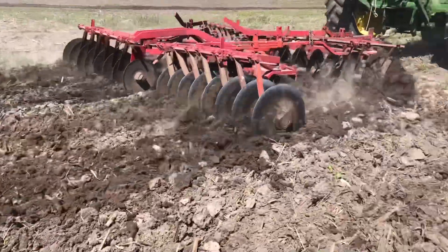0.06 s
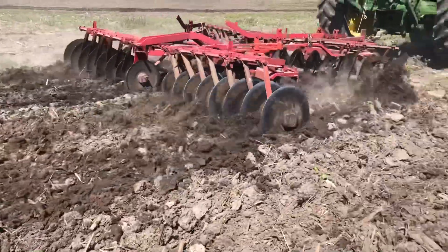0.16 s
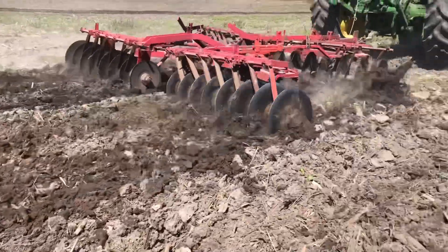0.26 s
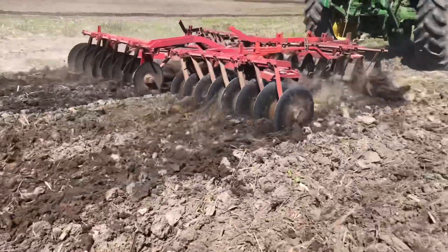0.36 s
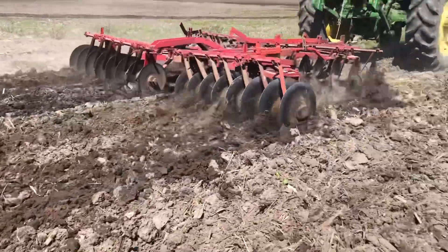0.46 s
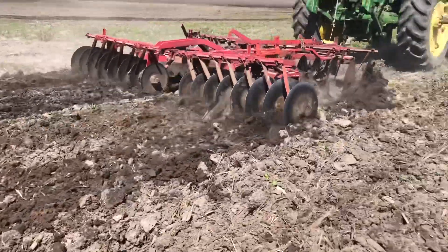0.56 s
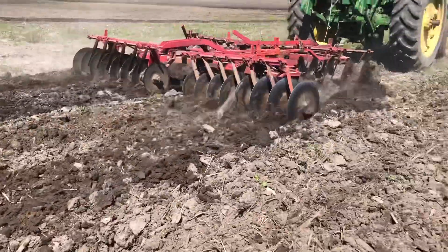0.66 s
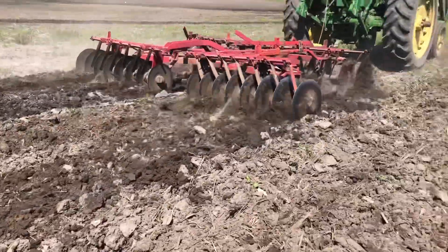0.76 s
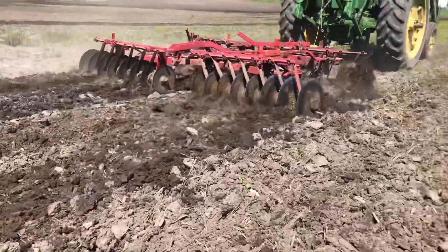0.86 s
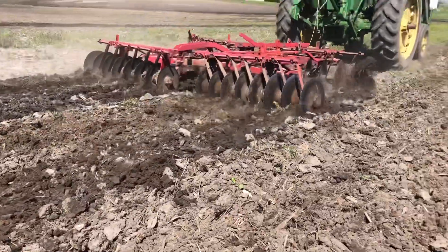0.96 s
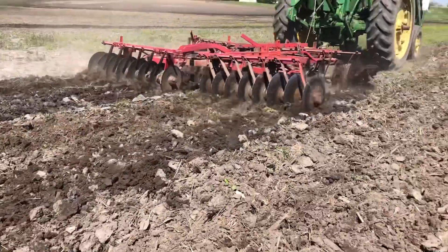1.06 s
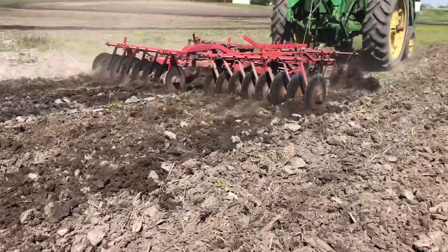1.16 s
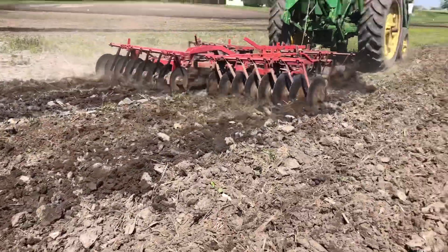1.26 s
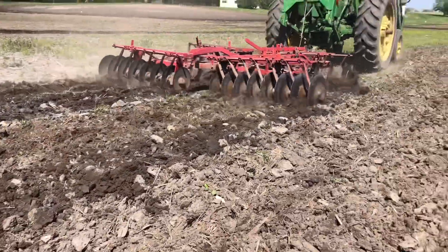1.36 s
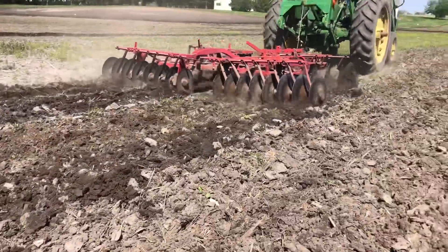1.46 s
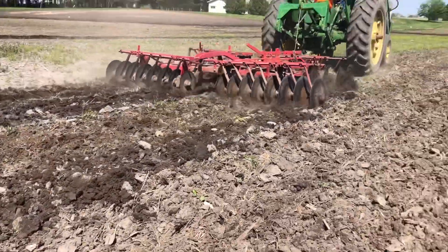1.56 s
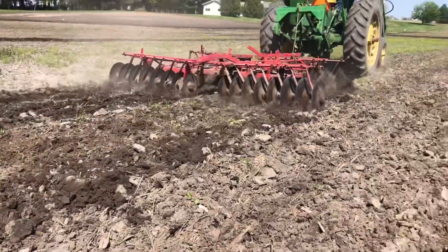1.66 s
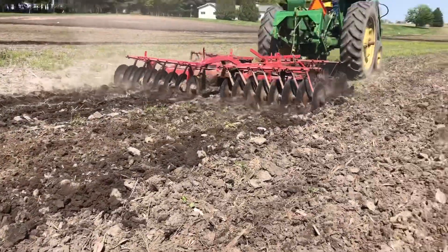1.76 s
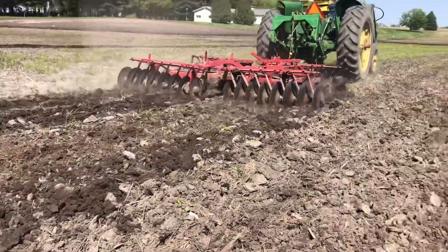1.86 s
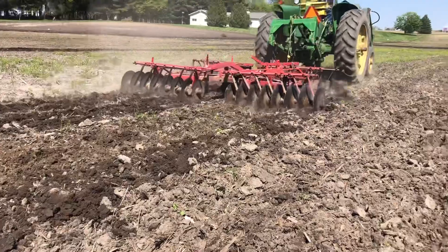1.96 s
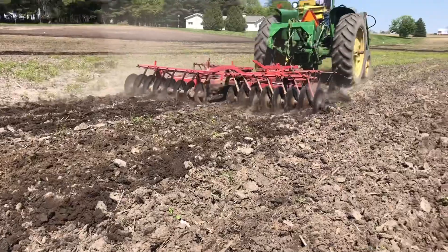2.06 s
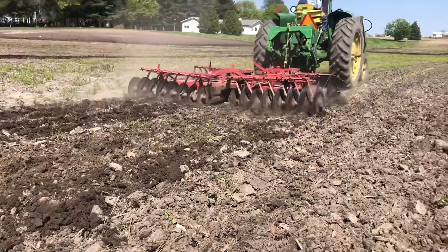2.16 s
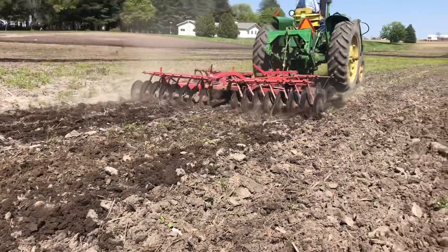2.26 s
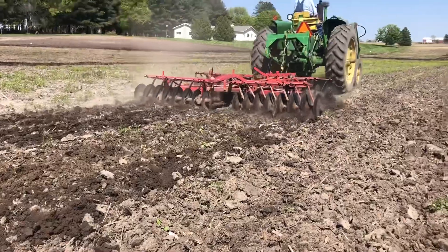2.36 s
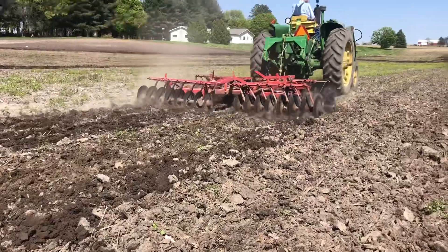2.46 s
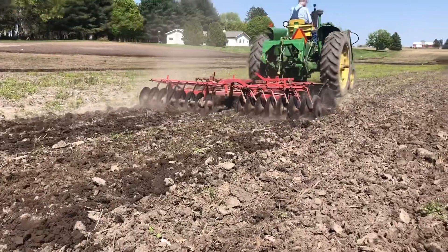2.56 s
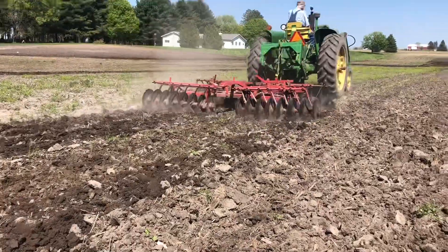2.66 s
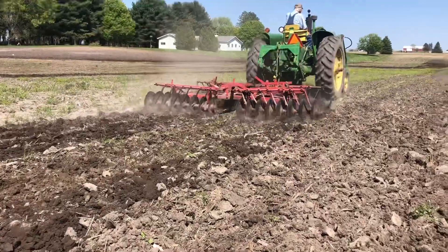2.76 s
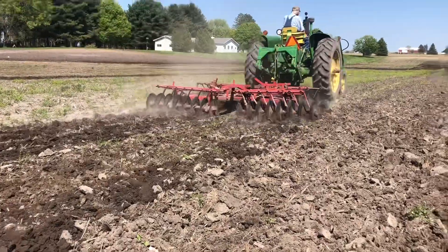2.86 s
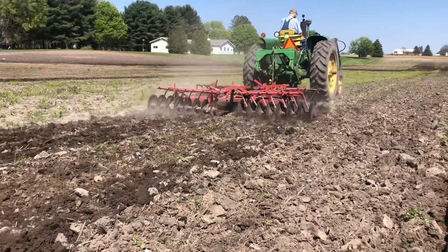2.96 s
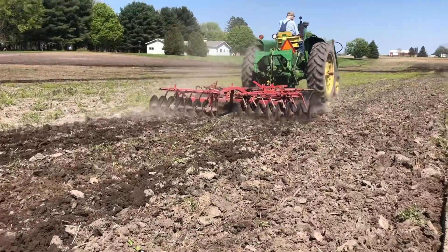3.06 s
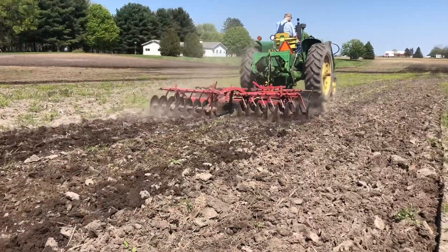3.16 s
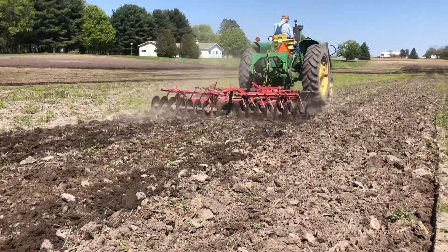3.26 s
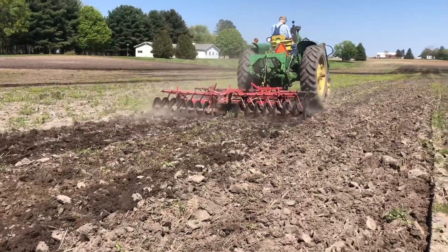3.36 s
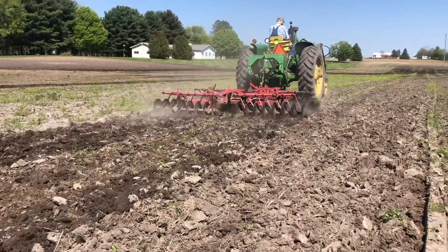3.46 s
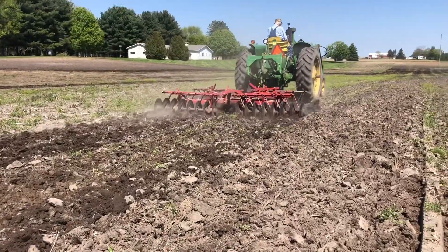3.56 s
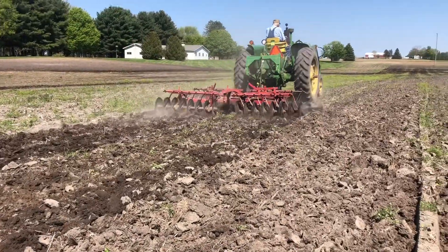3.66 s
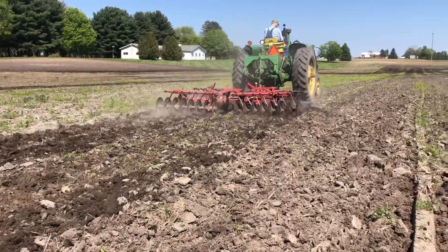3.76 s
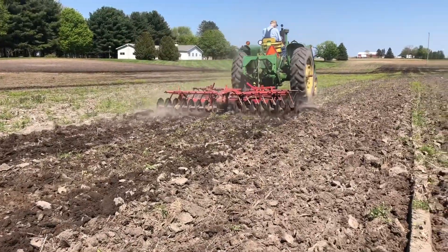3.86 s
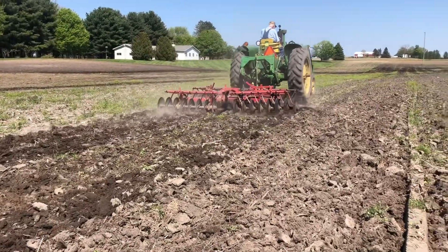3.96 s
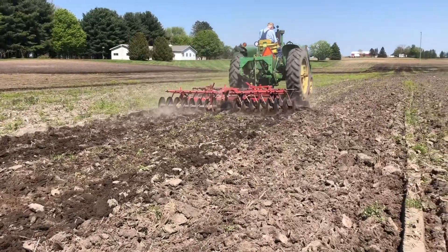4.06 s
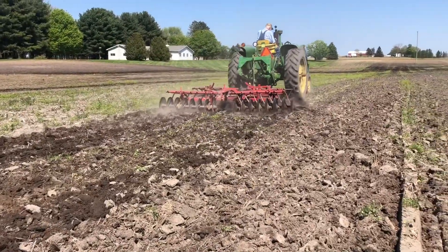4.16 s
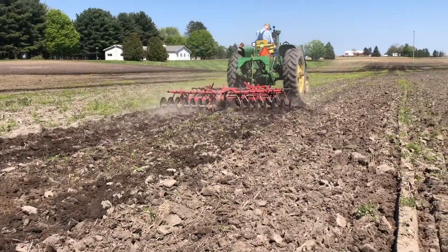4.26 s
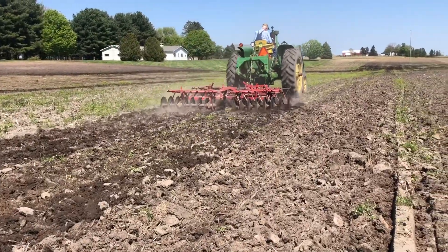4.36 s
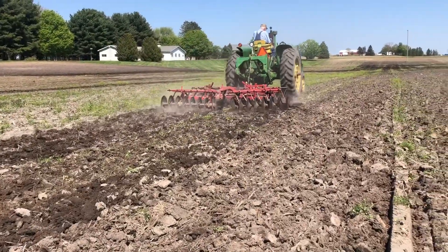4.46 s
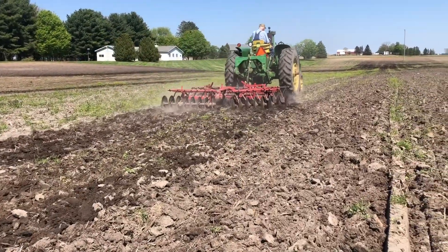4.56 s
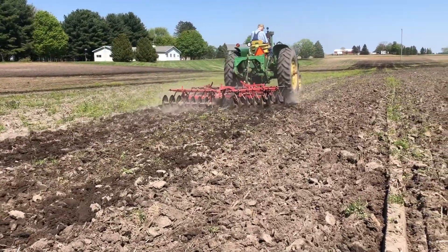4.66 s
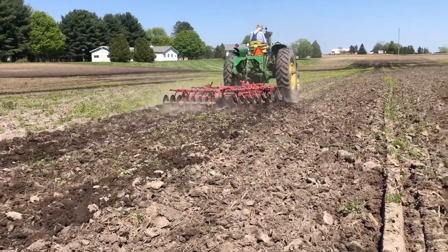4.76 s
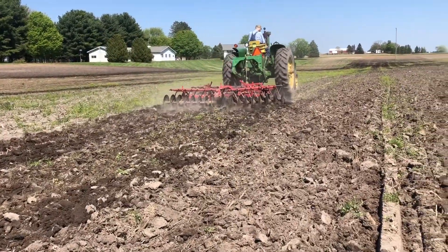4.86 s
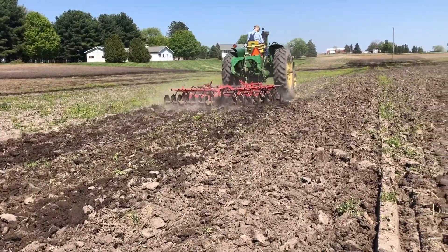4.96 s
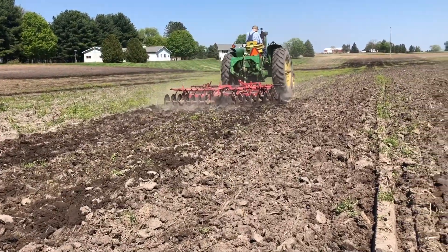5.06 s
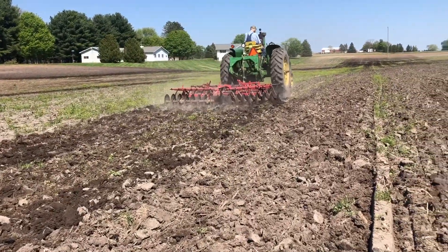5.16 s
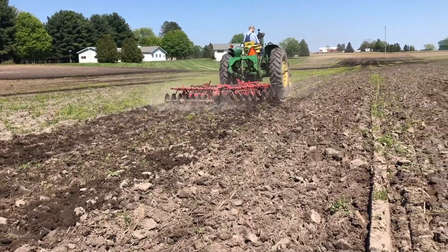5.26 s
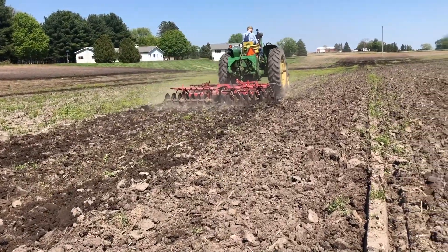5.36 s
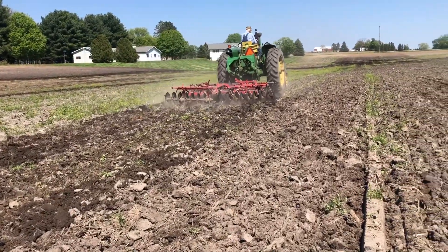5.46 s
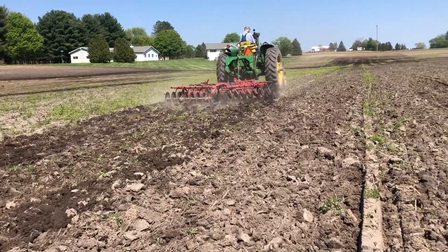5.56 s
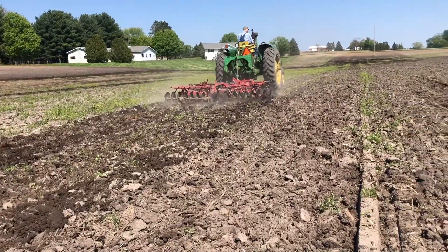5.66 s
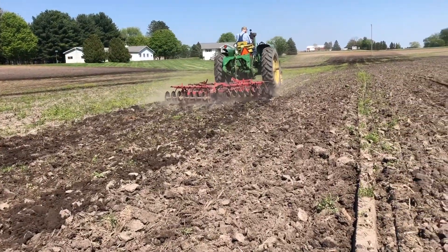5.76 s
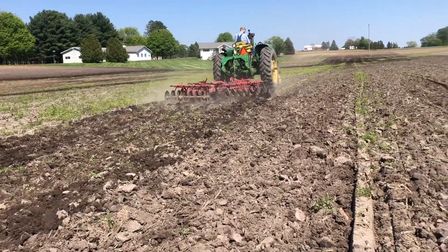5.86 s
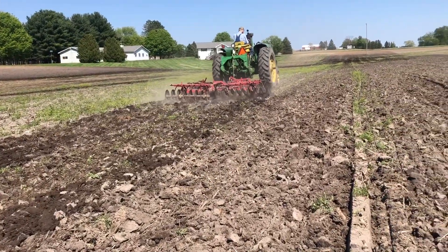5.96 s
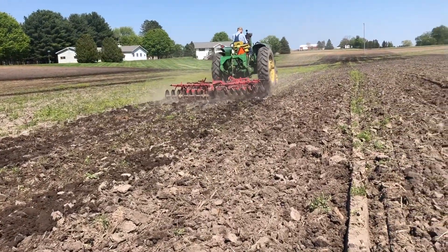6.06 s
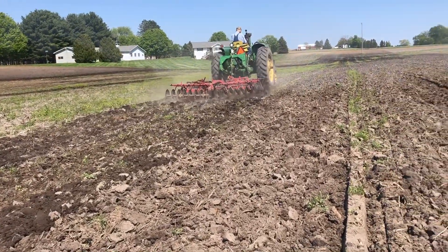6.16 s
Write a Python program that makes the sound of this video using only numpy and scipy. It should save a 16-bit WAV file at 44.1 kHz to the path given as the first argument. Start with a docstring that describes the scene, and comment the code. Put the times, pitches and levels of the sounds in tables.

```python
"""Dry, open field, a phone as microphone. A four-cylinder tractor pulls a disc harrow away, 10 m to 21 m.
From the start uneven firings boom in the exhaust, valve gear clatters and gears whine, while the discs
crunch through soil, scrape on gravel and clink on stones. Between 2 and 4 s dry bearings squeak.
Around 5 s a loose panel buzzes harder with the engine; just after 6 s a disc rim squeals on steel."""
import sys
import numpy as np
from scipy import signal
from scipy.fft import rfft, irfft
from scipy.io import wavfile
from scipy.ndimage import uniform_filter1d

SR = 44100
rng = np.random.default_rng(int(sys.argv[2]) if len(sys.argv) > 2 else 0)


def digitize_waveform(pressure):
    """Quantize a signal to 16-bit integers and store it at the path in sys.argv[1].

    Rows of a 2-D input are taken as channels; values are limited to [-1, 1].
    """
    field = np.atleast_2d(pressure).T
    bounded = np.clip(field, -1, 1)
    quanta = np.round(bounded * 32767).astype(np.int16)
    wavfile.write(sys.argv[1], SR, quanta)


N = 273861
TOP_HZ = 15750  # upper limit of the microphone

# the cylinders in firing order: strength/dB, lag in the manifold/ms
CYLINDERS = [(-3.5, 5.95), (2.07, 5.21), (-1.5, 5.64), (3, 6.42)]


def undb(db):
    """Decibels to gain."""
    return 10 ** (np.asarray(db) / 20)


def level(x, db=0):
    """Set the rms level."""
    return x * undb(db) / np.sqrt(np.mean(x ** 2))


def curve(points):
    """One value per sample along (t/s, value) points."""
    return np.interp(np.arange(N) / SR, *np.transpose(points))


def walk(rate):
    """Random values held for 1 / rate seconds and smoothed twice; rms 1."""
    hold = int(SR / rate)
    steps = np.repeat(rng.standard_normal(N // hold + 1), hold)
    return level(uniform_filter1d(uniform_filter1d(steps, hold), hold)[:N])


def colour(x, points, size=16384):
    """Minimum-phase filter through (f/Hz, level/dB) points; circular, so steady sounds have no onset."""
    hz, db = np.transpose(points)
    grid = np.maximum(np.arange(size // 2 + 1) * SR / size, 1)
    gain = undb(np.interp(np.log(grid), np.log(hz), db))
    cepstrum = irfft(np.log(gain))
    cepstrum[1:size // 2] *= 2
    cepstrum[size // 2 + 1:] = 0
    response = irfft(np.exp(rfft(cepstrum)))
    return irfft(rfft(x) * rfft(response, len(x)), len(x))


def band(x, hz, width):
    """One resonance, gain 1 at the centre."""
    top = .45 * SR
    return signal.lfilter(*signal.iirpeak(min(hz, top), hz / min(width, top / 2), fs=SR), x)


def body(x, modes):
    """Steep-skirted resonances (f/Hz, width/Hz, level/dB), summed to rms 1."""
    return level(sum(undb(db) * band(band(x, hz, width), hz, width) for hz, width, db in modes))


def add(out, s, x):
    """Mix x into out at time s."""
    i = int(np.clip(s * SR, 0, N - 1))
    out[i:i + len(x)] += x[:N - i]


def swell(length):
    """A smooth rise and fall over length seconds."""
    return np.sqrt(np.hanning(int(length * SR)))


def soil(cracks_per_s=520, spread_db=6.5, crack_db=-4, hiss_db=5.0):
    """Steel slides through earth with a hiss while clods and dry stalks break in tiny cracks."""
    # colour of crumbling soil: f/Hz, level/dB
    crumble = [(300, -9), (1500, 4.5), (4400, 4), (5300, 1), (6500, 0), (8400, 1), (10500, -1.5),
               (13000, -5.5), (16000, -5)]
    pitches = np.geomspace(3000, 15000, num=7)
    cracks = 0
    for hz in pitches:
        sizes = undb(spread_db * np.minimum(rng.exponential(size=N), 4))
        breaks = rng.random(N) < cracks_per_s / len(pitches) / SR
        cracks += band(breaks * sizes * rng.choice([-1, 1], N), hz, width=1270)
    earth = colour(level(cracks, crack_db) + undb(hiss_db) * rng.standard_normal(N), crumble)
    spurts_db = 0.8 * walk(25.07) + 1.6 * walk(90)  # clods give way unevenly
    return level(earth) * undb(spurts_db)


def clink(treble_db, crack_s=.0004, grit_db=-13, grit_t60_s=0.048, ring_db=-34):
    """A stone meets a disc: a sharp crack, a spray of grit and a short ring."""
    # modes of a disc, damped by the earth: f/Hz, level/dB, t60/s
    disc_modes = [(2730, -10, 0.046), (4470, 11.5, 0.05), (4940, -10, .035), (5800, -16, .04),
                  (6500, 5, .03), (7150, -10, .04), (8500, 0, 0.035), (9250, 9.5, 0.029)]
    t = np.arange(SR // 5) / SR
    push = np.exp(-t / crack_s) + undb(grit_db) * undb(-60 * t / grit_t60_s)
    ring = 0
    for hz, db, t60 in disc_modes:
        strength = undb(db + 2 * rng.standard_normal())
        pitch = hz * (1 + 0.016 * rng.standard_normal())
        ring += strength * np.sin(2 * np.pi * pitch * t) * undb(-60 * t / t60)
    tone = [(700, -29), (2200, -4.5), (4000, 4), (6200, 3),
            (10000, treble_db + 20), (15000, treble_db + 9)]
    hit = colour(push * rng.choice([-1, 1], len(t)) + undb(ring_db) * ring, tone, size=512)
    return undb(-12) * hit / np.std(hit[:128])  # the first 3 ms carry the strength of the blow


def pebbles(per_s=5.5, range_db=22):
    """Small stones tick on the discs at random moments."""
    out = np.zeros(N)
    for when, strength in rng.random((int(per_s * N / SR), 2)):
        add(out, when * N / SR, undb(-33 + range_db * strength) * clink(treble_db=-7))
    return out


def squeals():
    """A disc rim rubs on steel, which excites its high resonances."""
    # resonances of the rim: f/Hz, width/Hz, level/dB
    rim_modes = [(6050, 900, -8), (9830, 170, 3), (12400, 700, -6), (14050, 300, 0), (14700, 1400, -7)]
    # rubs: t/s, length/s, level/dB
    rubs = [(6.097, 0.025, -37.5), (6.137, 0.071, -42)]
    ringing = body(rng.standard_normal(N), rim_modes)
    pressure = np.zeros(N)
    for s, length, db in rubs:
        add(pressure, s, level(swell(length), db))
    return pressure * ringing


def squeaks(waver=0.0052, overtone_db=-11, flutter_db=4):
    """Stick-slip in a dry disc bearing: a wavering, fluttering tone with weak overtones."""
    # slips of the bearings: t/s, length/s, level/dB, f/Hz
    slips = [(2.081, .016, -37.5, 1810), (2.605, 0.013, -35, 3820), (3.538, 0.023, -38.5, 4260),
             (3.571, 0.045, -32, 4200)]
    out = np.zeros(N)
    for s, length, db, hz in slips:
        shape = swell(length)
        drift, grip = walk(730)[:len(shape)], walk(360)[:len(shape)]
        phase = 2 * np.pi * np.cumsum(hz * (1 + waver * drift)) / SR
        tone = sum(undb(overtone_db * k) * np.sin((k + 1) * phase) for k in range(int(TOP_HZ / hz)))
        add(out, s, level(tone * shape * undb(flutter_db * grip), db))
    return out


def scrapes(rough_db=3):
    """Clods and buried gravel catch and slip along a disc."""
    # grinding contacts: t/s, length/s, level/dB, f/Hz
    contacts = [(.672, 0.026, -31.5, 1400), (.674, .05, -38.5, 4200), (0.871, 0.29, -40, 620),
                (1.692, 0.018, -29, 3180), (1.712, 0.028, -34, 4000), (1.782, 0.04, -31, 2600),
                (2.583, 0.05, -34, 4360), (2.85, 0.61, -41, 720), (4.404, .042, -42, 3970)]
    out = np.zeros(N)
    for s, length, db, hz in contacts:
        shape = swell(length)
        catching = rng.standard_normal(N) * undb(rough_db * walk(540))
        add(out, s, level(band(catching[:len(shape)], hz, width=0.51 * hz) * shape, db))
    return out


def stones():
    """Large stones clink on the discs."""
    # blows: t/s, relative level/dB, relative treble/dB
    blows = [(0.0531, -14, -10), (0.341, -11, -20), (0.6789, -20, -19), (1.0325, -18, -20),
             (1.311, -13, -12), (1.374, -15, -23), (1.6249, -9.5, -18), (1.691, -17, -25),
             (1.7113, -12.5, -15), (2.5925, -18, -20), (3.1162, -6, -27), (3.243, -12, -25),
             (3.3062, -8.5, -20.5), (3.7282, -15.5, -25), (3.7698, -13, -18), (3.8562, -16.5, -17),
             (3.927, -14.5, -14), (4.4792, -19, -17), (4.51, -14.5, -24), (5.0537, -14.5, -17),
             (5.6141, -19, -14), (5.8738, -19, -13), (5.901, -19, -21)]
    out = np.zeros(N)
    for s, db, treble_db in blows:
        add(out, s, undb(db) * clink(treble_db))
    return out


def engine_speed(hunt_hz=.55, crest_s=.53, period_s=1.16, settle_s=4.5):
    """Firings per second: the governor overshoots to and fro, less each time."""
    # firing rate, easing slowly with the load: t/s, f/Hz
    firing_rate = [(0, 57.18), (1.2, 57.13), (2.5, 56.95), (4.5, 56.95), (6.21, 57.15)]
    t = np.arange(N) / SR
    hunting = hunt_hz * np.exp(-t / settle_s) * np.cos(2 * np.pi * (t - crest_s) / period_s)
    return curve(firing_rate) + hunting


def panel(firings, hz=1495, width_hz=130, rattle_db=-54, swing_db=8):
    """A loose sheet of metal rattles once per engine cycle, in bouts much harder."""
    # bouts of harder buzzing: middle t/s, length/s, level/dB
    bouts = [(4.72, .6, -52), (5.218, 0.13, -38), (5.457, 0.11, -49)]
    ringing = body(rng.standard_normal(N), [(hz, width_hz, 0)])
    shaking = np.full(N, undb(rattle_db))
    for s, length, db in bouts:
        add(shaking, s - length / 2, undb(db) * swell(length))
    throb = undb(swing_db * np.cos(2 * np.pi * firings / len(CYLINDERS)))
    return level(ringing * throb) * shaking


def gear_whine(firings, swing_db=3.0, waver_rad=0.92):
    """Meshing teeth sing in step with the engine; their load comes and goes, so each tone wavers."""
    # pitches of the tones: multiples of the engine cycle rate
    orders = [46, 52, 69, 72, 114]
    # strength of each tone: relative level/dB
    levels = [-9, -2, -7, 1.5, -13]
    cycles = firings / len(CYLINDERS)
    whine = 0
    for order, db in zip(orders, levels):
        load = undb(db + swing_db * walk(12))
        whine += load * np.sin(2 * np.pi * order * cycles + waver_rad * walk(25))
    return whine


def knocks(firings, repeat_db=-1, throb_db=0.35, size=3092):
    """Metal parts strike much alike in every engine cycle, hardest just after a firing."""
    pattern = rng.standard_normal(size)
    alike = pattern[(firings / len(CYLINDERS) % 1 * size).astype(int)]
    throb = undb(throb_db * (1 - 2 * (firings % 1)))
    return (undb(repeat_db) * alike + rng.standard_normal(N)) * throb


def machinery(firings, flutter_db=1.0):
    """Valve gear clatters through the block and the transmission housing, with gear whine on top."""
    # broad colour of the clatter: f/Hz, level/dB
    clatter = [(100, -1.5), (290, 1.5), (380, -4), (530, 1), (730, 1), (900, -0.5), (1130, 1.5), (1270, -5),
               (1600, -7.5), (1750, -11.5), (2300, -2.5), (3000, -9), (3500, -5.5), (5000, -14.5),
               (12000, -27.5)]
    # resonances of the block and bonnet: f/Hz, width/Hz, level/dB
    block_modes = [(690, 310, -2), (1483, 98, 3.5), (1615, 74, 1), (1859, 46, 1.5), (2070, 42, 2.5),
                   (2695, 92, -7), (3175, 59, 1.5), (3335, 96, -1), (4216, 34, -3.5)]
    # resonances of the transmission housing: f/Hz, width/Hz, level/dB
    housing_modes = [(517.6, 69, 3), (599, 244, 4), (1375, 87, 3), (1622, 55, 3.5), (1962, 51, 0),
                     (2160, 49, 4), (2212, 93, 5), (2612, 123, 0.5), (2813, 60, 0), (3415, 260, -3.5),
                     (4313, 54, -6)]
    # the machinery's metallic ring fades until 4 s, then partly returns: t/s, relative level/dB
    ring_level = [(0, 0.5), (1.2, -2), (2.8, -7), (4, -19.5), (6.21, -8)]
    ring_db = curve(ring_level)
    broad = level(colour(knocks(firings), clatter), -2.5) * undb(.5 * walk(9))
    block = body(knocks(firings), block_modes) * undb(-6 + flutter_db * walk(18))
    housing = body(knocks(firings), housing_modes) * undb(1 + ring_db + flutter_db * walk(14))
    gears = level(gear_whine(firings), -15)
    return (broad + block + housing + gears) / np.sqrt(1 + undb(2 * ring_db))  # keeps the sum near even


def exhaust(firings, jitter_ms=.18, scatter_db=1.4, gas_db=-20, chamber_hz=173.9):
    """One pulse per firing booms in the pipe; unequal cylinders make it throb once a cycle."""
    # colour of the exhaust pipe: f/Hz, level/dB
    pipe_colour = [(22, -31), (43, -11), (54, -5.5), (75, 9.5), (97, -14), (114, 6), (135, 1), (170, 2.08),
                   (205, -8.5), (235, -19.5), (290, -23), (345, -49.5), (700, -55), (2000, -90)]
    # the engine is already running: a second of earlier firings rings the pipe
    firings = np.concatenate([firings[0] * np.arange(1 - SR, 1), firings])
    count = np.arange(int(firings[0]), int(firings[-1]) + 1)
    strength_db, lag_ms = np.array(CYLINDERS)[count % len(CYLINDERS)].T
    jitter, scatter = rng.standard_normal((len(count), 2)).T
    on_beat = np.interp(count, firings, np.arange(len(firings)))
    at = on_beat + (lag_ms + jitter_ms * jitter) * SR / 1000
    pulses = np.zeros(len(firings))
    pulses[np.clip(at, 0, len(pulses) - 1).astype(int)] = undb(strength_db + scatter_db * scatter)
    # turbulent gas roughens the upper part of the boom
    gas = rng.standard_normal(len(pulses))
    turbulence = gas + 7 * band(band(gas, hz=243, width=118), hz=243, width=118)
    pipe = colour(level(pulses) + undb(gas_db) * turbulence, pipe_colour)
    # the muffler chamber rings on between firings and rounds the beat
    muffled = 2 * band(pipe, chamber_hz, width=9.0) - pipe
    return level(muffled[-N:])


def scene(start_m=10.16, drive_m_s=1.78, exhaust_db=-16, machine_db=-29.5, soil_db=2.93):
    """Open field, one fixed microphone, no walls to echo; exhaust and machinery fade as 1 / distance."""
    # soil and pebbles as the discs bite and draw away: t/s, relative level/dB
    bite = [(0.0, -37), (1.9, -38), (2.37, -42), (3.23, -41.5), (3.65, -43.5), (4.36, -44), (5.41, -46),
            (5.69, -45), (6.21, -42)]
    firings = np.cumsum(engine_speed()) / SR  # running count
    nearness = start_m / (start_m + drive_m_s * np.arange(N) / SR)
    engine = exhaust(firings) * undb(exhaust_db) + machinery(firings) * undb(machine_db)
    tractor = engine * nearness + panel(firings)
    steel = stones() + scrapes() + squeaks() + squeals()
    earth = (soil() * undb(soil_db) + pebbles()) * undb(curve(bite))
    return (tractor + steel + earth)[None]


def record(dry, low_hz=36):
    """The phone's microphone sheds the deepest rumble and cuts the top."""
    thin = signal.sosfilt(signal.butter(2, low_hz, "high", fs=SR, output="sos"), dry)
    return signal.sosfilt(signal.ellip(10, .2, 70, TOP_HZ, fs=SR, output="sos"), thin)


dry = scene()
out = record(dry)
digitize_waveform(out)
```